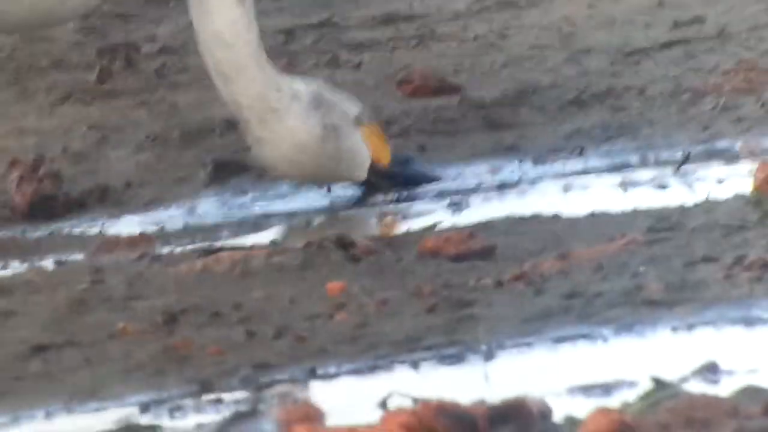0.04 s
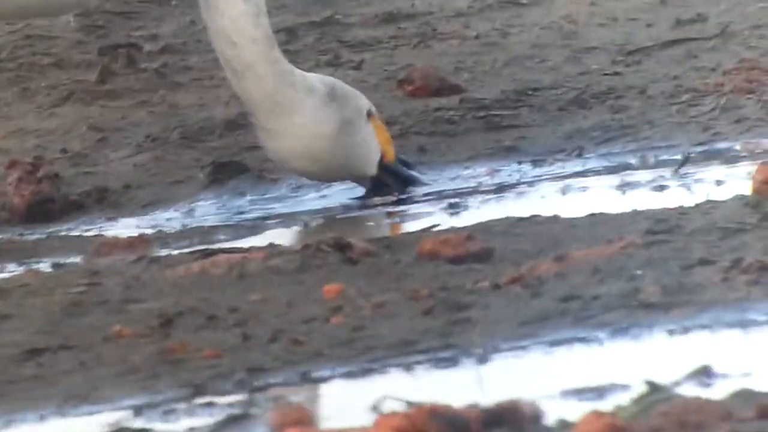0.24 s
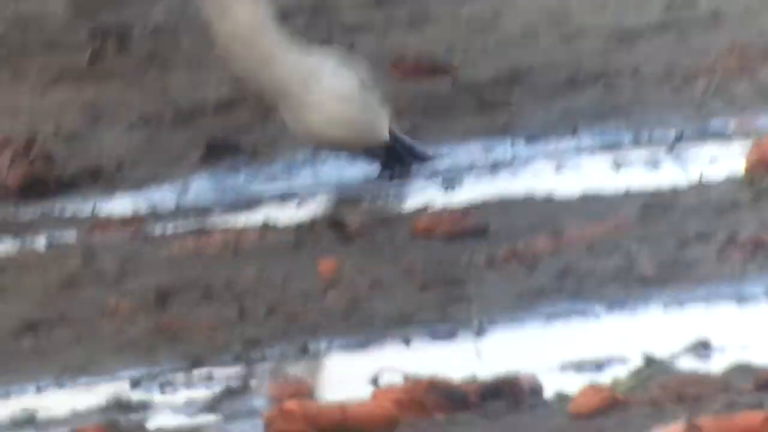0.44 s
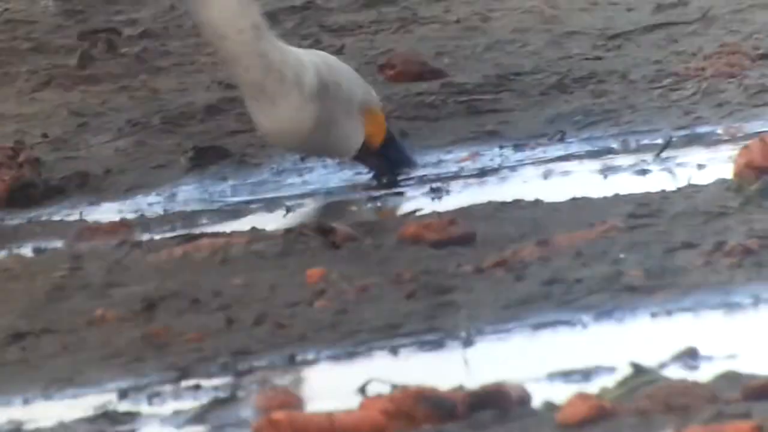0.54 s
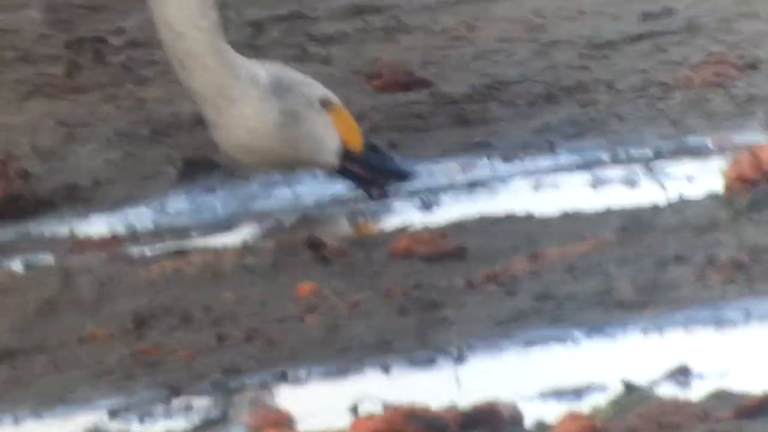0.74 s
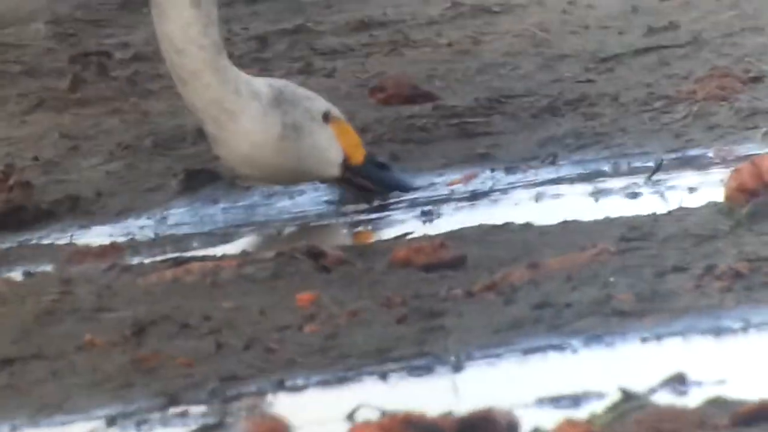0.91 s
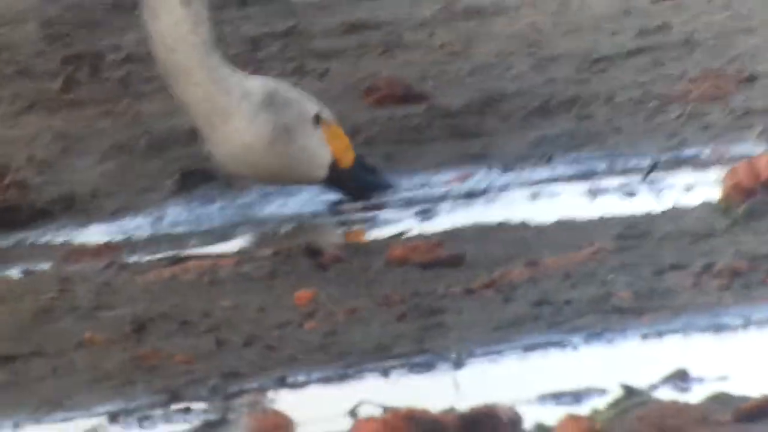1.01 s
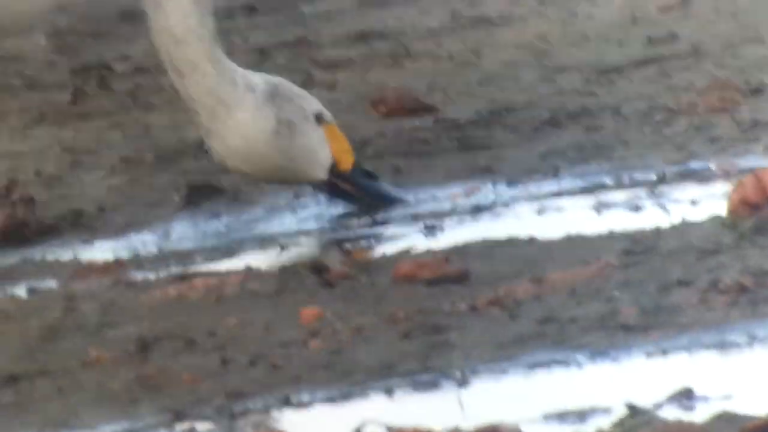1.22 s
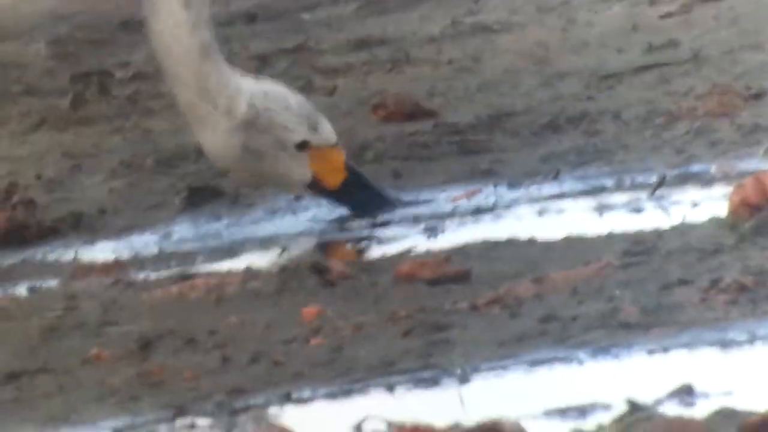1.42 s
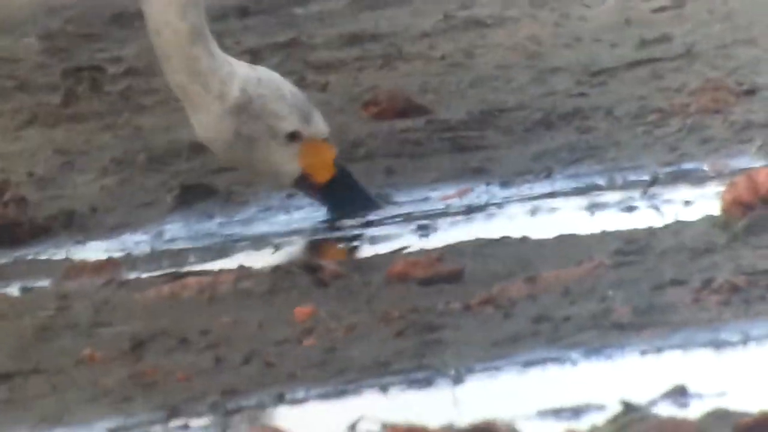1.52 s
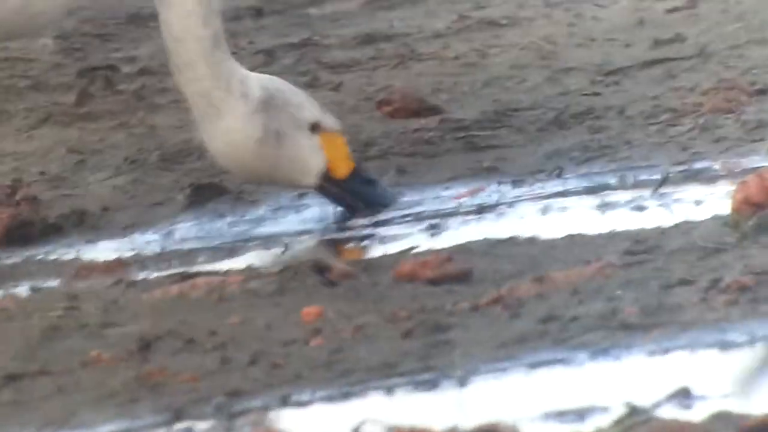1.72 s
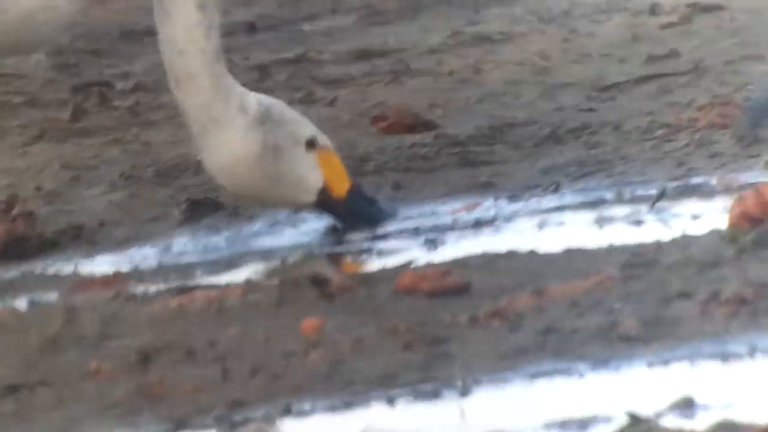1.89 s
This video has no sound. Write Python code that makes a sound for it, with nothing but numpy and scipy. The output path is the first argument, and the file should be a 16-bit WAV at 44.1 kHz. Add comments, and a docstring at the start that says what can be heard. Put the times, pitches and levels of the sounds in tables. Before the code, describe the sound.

Swan honks, clear and nasal with gliding pitch, outdoors on open mud. A higher bird calls at 0.2-0.5 seconds, louder at 0.7-0.9, then briefly and roughly at 1.0-1.1. A lower bird gives one short brassy honk at 1.6-1.75. A steady distant roar leans left throughout, with faint smooth hiss. Small low wind puffs touch the microphones, strongest as fluttering thumps on the right near 0.95.

```python
"""Open muddy ground, with two swans honking in front of a recorder that has two microphone ports.
The calls are clean and nasal, stacks of partials on one gliding pitch: three from a higher bird, one from a lower.
A distant roar arrives from one side: coloured noise, partly shared by the two ports.
Wind puffs on the ports are bursts of low noise; the strongest adds ringing buffets, mostly at the right port.
The recorder adds smooth bright hiss, and the top of the sound is cut steeply."""
import sys
import numpy as np
from scipy import signal
from scipy.fft import rfft, irfft, next_fast_len
from scipy.io import wavfile
from scipy.ndimage import uniform_filter1d

SR = 44100
rng = np.random.default_rng(int(sys.argv[2]) if len(sys.argv) > 2 else 0)


def output_pcm(signal):
    """Save a mono or channel-first signal as 16-bit PCM at the path in sys.argv[1].

    Samples are clipped to [-1, 1] before scaling.
    """
    pcm = np.clip(np.atleast_2d(signal).T, -1, 1) * 32767
    wavfile.write(sys.argv[1], SR, np.round(pcm).astype(np.int16))


N = 85995  # samples, 1.95 s


def from_db(db):
    """Decibels to gain."""
    return 10 ** (np.asarray(db) / 20)


def rms_one(x):
    """Scale to unit rms."""
    return x / np.sqrt(np.mean(x ** 2) + 1e-20)


def at_hz(points, hz, axis=1):
    """Read a column of a table along log frequency."""
    points = np.array(points)
    return np.interp(np.log(hz), np.log(points[:, 0]), points[:, axis])


def drift(rate, size):
    """Slow random wander of about unit spread: noise through two equal poles at the rate in Hz."""
    step, settle = 8, 6000  # made at an eighth of the sample rate; the start-up is dropped
    count = size // step + 2
    pole = np.exp(-2 * np.pi * rate * step / SR)
    slow = signal.lfilter([1], [1, -2 * pole, pole * pole], rng.standard_normal(count + settle))
    return np.interp(np.arange(size) / step, np.arange(count), rms_one(slow)[settle:])


# Calls of the higher bird, one list per call. Each row: time in seconds, pitch in Hz, fundamental in dB,
# second partial in dB, upper partials in dB, extra loss in dB per multiple from the fifth to the ninth,
# flutter from 0 to 1, rasp in dB.
HIGHER_BIRD_CALLS = [
    [(.197, 601, -58, -60, -74, 4, .02, -72), (.212, 618.3, -43, -43, -70, 3, 0.1, -76),
     (.227, 638, -37, -39, -57, 0.5, 0.03, -72), (.241, 650, -35.5, -36.5, -63, 2.5, 0.08, -72),
     (.253, 657.4, -34, -34.5, -54.5, -1, 0, -72), (.271, 660, -33, -33.5, -48.5, 0.5, 0, -72),
     (.284, 653, -36, -43, -62, 0, 0.05, -72), (.291, 662, -41, -43, -80, -6, 0.2, -72),
     (.298, 697, -33, -47, -79, -6, 0, -69), (.305, 672, -38.5, -47, -70, 2, 0.1, -74),
     (.316, 645.3, -31.5, -38.5, -51, 0.5, 0.04, -78), (.345, 645, -35.5, -39.5, -54.5, 2, 0.07, -81),
     (.381, 652, -34.5, -35.5, -57, 1.5, 0, -70), (.42, 663.2, -33, -35, -51, 1.5, 0, -72),
     (.437, 659, -34, -38.5, -54, 1, .03, -72), (.452, 650, -41.5, -51, -78, 1, .05, -74),
     (.461, 666, -39, -51, -71, 1, .05, -72), (.476, 621, -36.5, -45, -61, -1, 0.14, -66),
     (.499, 627, -44, -66, -76, 1, .05, -72)],
    [(.702, 610, -49, -54, -72, 4, .02, -70), (.709, 627, -37, -41, -58, 4, 0.1, -68),
     (.724, 628, -29.5, -38, -75, 4, 0, -75), (.742, 639, -29.5, -46, -61, 1, 0, -71),
     (.756, 660, -31, -55, -75, -4, 0.04, -75), (.774, 651, -36.5, -54, -68, 1, 0, -76),
     (.798, 643.4, -28.5, -36.5, -56, 5, .03, -60), (.82, 649, -26, -30, -56.5, 5, 0, -55),
     (.848, 649, -26, -33, -52, 3.5, 0.04, -67), (.88, 635, -27, -37.5, -65, -2, 0, -73),
     (.898, 618, -32.5, -47, -51.5, 7, 0.1, -59), (.911, 613, -34, -60, -61, 5, 0.1, -64),
     (.921, 618, -62, -62, -73, 5, .02, -68)],
    [(1.009, 628, -34, -58, -72, 4, 0.2, -68), (1.015, 634, -34.5, -58, -68, 4, 0.8, -67),
     (1.024, 628, -31.5, -40.5, -54, 6, 0.6, -66), (1.04, 625, -31.5, -42.5, -51, 4, 0.25, -60),
     (1.056, 613, -34.5, -47, -53, 3, 0.15, -58), (1.066, 601, -39, -52, -57, 8, .1, -67),
     (1.076, 590, -58, -38, -59, 4, 0.3, -68)],
]
# The call of the lower bird. Each row: the same columns in the same units.
LOWER_BIRD_CALLS = [
    [(1.612, 490, -53, -54, -64, 0, .02, -72), (1.622, 496.7, -44, -41, -56, 0, .02, -72),
     (1.636, 496.7, -40, -33, -46, -1.5, .02, -70), (1.655, 505, -36.5, -30.5, -41.5, -1.5, .02, -72),
     (1.672, 506, -39, -29, -39.5, 0.5, 0.018, -72), (1.695, 500.5, -37.5, -29, -38.5, 0.5, .02, -72),
     (1.712, 495, -39.5, -31, -41.5, 0.5, .02, -68), (1.722, 483.5, -41.5, -32, -45, 4, .02, -70),
     (1.736, 473, -46, -35, -54, 8, .02, -72), (1.753, 477, -60, -50, -72, 8, .02, -72)],
]
# Partials of the higher bird as they reach the two ports.
# Each row: multiple of the pitch, level in dB over its control, left minus right in dB, left lead in radians.
HIGHER_BIRD_PARTIALS = [(1, 0.5, 3, 0.12), (2, 0, 3, -.45), (3, -1, 5.5, -2), (4, -12.5, -20, -2),
                        (5, 1, 11, 0.4), (6, -1, 4, 1.3), (7, 0.5, -2, 2), (8, -9.5, 3, 1),
                        (9, -18, -1, 1.5), (10, -19, -2, 1.5), (11, -17, 8, 1.5)]
# Partials of the lower bird at the ports. Each row: the same columns in the same units.
LOWER_BIRD_PARTIALS = [(1, 0, 2.5, .1), (2, 1, 6, -0.66), (3, 2, 4.5, -1.1), (4, -12.5, 12.5, -1.1),
                       (6, -17.5, 9, 0.09), (7, -9.5, -2.3, -0.32), (10, -31, 2, 0), (12, -37, 9, -0.039),
                       (14, -32, 6, 0.11)]
# A narrow resonance of the open beak. Each row: time in seconds, centre in Hz, lift in dB.
BEAK_RESONANCE = [(.2, 5000, 10), (.24, 5200, 16), (.256, 5250, 2.5), (.825, 4550, 0), (.848, 4550, 3),
                  (.87, 4500, 1), (1.635, 6050, 0), (1.665, 6100, 10), (1.685, 7050, 9), (1.715, 7000, -2)]
BEAK_WIDTH_HZ = 380  # from the centre to where the lift in dB has fallen to 1/e
FLUTTER_HZ, FLUTTER_GROWTH = 123.7, 0.61  # tone this far above each partial; exponent on the multiple
JITTER_SHARE, JITTER_HZ = .0012, 60  # random pitch wobble: spread as a share of the pitch, rate
SHIMMER_DB, SHIMMER_HZ = 1.5, 26  # random level wobble of each upper partial: spread, rate
RASP_LOW_HZ, RASP_HIGH_HZ, RASP_PAN_DB = 3330, 3900, -5  # throat air noise: band, left minus right
HALF_MULTIPLE, HALF_DB = 5.5, -2  # line between two partials from uneven cycles; dB over the air noise


def swan(calls, partials):
    """Sum clean partials on one pitch; a second vibration adds side tones, throat air a rasp."""
    out = np.zeros((2, N))
    side = np.array([[.5], [-.5]])  # splits each left-right difference evenly
    throat = signal.butter(2, [RASP_LOW_HZ, RASP_HIGH_HZ], "band", fs=SR, output="sos")
    beak_times, *beak_columns = np.transpose(BEAK_RESONANCE)
    for rows in calls:
        times, *columns = np.transpose(rows)
        first, last = int(times[0] * SR), int(times[-1] * SR)
        t = np.arange(first, last) / SR
        hz, low_db, second_db, upper_db, dull_db, flutter, rasp_db = [np.interp(t, times, c) for c in columns]
        flutter = np.clip(flutter, 0, 1)
        flutter_phase = 2 * np.pi * FLUTTER_HZ * (t - t[0])
        wobbling_hz = hz * (1 + JITTER_SHARE * drift(JITTER_HZ, len(t)))
        phase = 2 * np.pi * np.cumsum(wobbling_hz) / SR
        beak_hz, beak_db = [np.interp(t, beak_times, c) for c in beak_columns]
        edge = signal.windows.tukey(len(t), .06)

        for multiple, level_db, pan_db, lead in partials:
            loss_db = dull_db * np.clip(multiple - 5, 0, 4)
            shimmer_db = SHIMMER_DB * drift(SHIMMER_HZ, len(t))
            lift_db = beak_db * np.exp(-((multiple * hz - beak_hz) / BEAK_WIDTH_HZ) ** 2)
            if multiple == 1:
                control_db = low_db
            elif multiple == 2:
                control_db = second_db
            else:
                control_db = upper_db - loss_db + shimmer_db + lift_db
            gain = np.sqrt(2) * from_db(control_db + level_db + side * pan_db) * edge
            turn = multiple * phase + rng.uniform(0, 2 * np.pi) + side * lead
            above = flutter * multiple ** FLUTTER_GROWTH
            pair = np.sin(turn) + above * np.sin(turn + flutter_phase)
            out[:, first:last] += gain * pair / np.sqrt(1 + above ** 2)  # flutter leaves the power alone

        air = rms_one(signal.sosfilt(throat, rng.standard_normal(len(t))))
        half_line = np.sqrt(2) * from_db(HALF_DB) * np.sin(HALF_MULTIPLE * phase)
        out[:, first:last] += (air + half_line) * edge * from_db(rasp_db + side * RASP_PAN_DB)
    return out


# Colour of the distant roar. Each row: frequency in Hz, relative density in dB per Hz.
ROAR_COLOUR = [(15, -58), (25, -41), (92, -11), (113, -10.5), (172, -3), (208, -7.5), (339, -4), (380, -6),
               (417, -5.5), (565, -11.5), (635, -6), (859, -5.5), (1030, -1.5), (1140, -5), (1610, -7),
               (1850, -11.5), (2340, -13), (2680, -19.5), (3720, -23.5), (4590, -29), (6500, -42),
               (8450, -59), (14300, -120)]
# Lean of the roar between the ports. Each row: frequency in Hz, left minus right in dB.
ROAR_LEAN = [(60, 0), (200, 0.7), (400, 1.4), (700, 3.5), (1300, 2.5), (2400, 1), (4400, 3), (6000, 0)]
# What both ports hear alike. Each row: frequency in Hz, share of the power from 0 to 1, left lead in radians.
ROAR_SHARED = [(60, 0.93, 0.4), (129, 1, -0.8), (295, 0.9, 0), (530, 0.77, -0.1), (736, 0.86, -1.33),
               (1120, 0.92, -1.72), (1430, 0.83, -3), (1940, 0.61, -3.5), (2295, 0.46, -6), (2940, 0.3, -6),
               (4000, 0.26, -5.5), (6000, 0, -1.5)]
ROAR_DB = -37.5  # rms over both ports
ROAR_SWELL_DB, ROAR_SWELL_HZ = .8, 5.7  # level wander of the whole roar: spread, rate
ROAR_PATCH_DB, ROAR_PATCH_HZ = .5, 0.9  # level wander of each octave: spread, rate


def roar():
    """Coloured noise: a shared part with a phase offset at the left port, and a part of each port's own."""
    size = next_fast_len(N)
    hz = np.maximum(np.arange(size // 2 + 1) * SR / size, 1)
    shared, left, right = rfft(rng.standard_normal((3, size)))
    alike = np.clip(at_hz(ROAR_SHARED, hz), 0, 1)
    left_turn = np.exp(1j * at_hz(ROAR_SHARED, hz, axis=2))
    common = np.sqrt(alike) * shared * np.array([left_turn, np.ones(len(hz))])
    own = np.sqrt(1 - alike) * np.array([left, right])
    pan = from_db(at_hz(ROAR_LEAN, hz) / 2)
    pair = from_db(at_hz(ROAR_COLOUR, hz)) * (common + own) * [pan, 1 / pan]

    out = np.zeros((2, N))
    swell_db = ROAR_SWELL_DB * drift(ROAR_SWELL_HZ, N)
    octave = np.clip(np.log2(hz / 30), 0, 9)
    for k in range(10):
        share = np.clip(1 - np.abs(octave - k), 0, 1)  # overlapping bands that add up to one
        band = irfft(pair * share, size)[:, :N]
        out += band * from_db(swell_db + ROAR_PATCH_DB * drift(ROAR_PATCH_HZ, N))
    return from_db(ROAR_DB) * rms_one(out)


# Light puffs of wind on the ports. Each row: centre in seconds, length in seconds between the 1/e points,
# level in dB at the stronger port, left minus right in dB.
WIND_PUFFS = [(0.161, 0.037, -42.5, -27), (0.293, 0.061, -47, -16), (0.519, 0.03, -37.5, 7),
              (.96, .05, -42, -18), (1.25, 0.029, -49, -18), (1.372, 0.014, -43, -19)]
PUFF_LOW_HZ, PUFF_HIGH_HZ = 110, 300
PUFF_LUMP_DB, PUFF_LUMP_HZ = 1.5, 61.0  # random level wobble: spread, rate


def wind():
    """Short lumpy puffs of low noise, unrelated at the two ports."""
    band = signal.butter(3, [PUFF_LOW_HZ, PUFF_HIGH_HZ], "band", fs=SR, output="sos")
    noise = rms_one(signal.sosfilt(band, rng.standard_normal((2, N))))
    local_power = uniform_filter1d(noise ** 2, size=900)
    steady_noise = noise / np.sqrt(local_power + .05)  # evens out chance swells
    t = np.arange(N) / SR
    gust = np.zeros((2, N))
    for centre, length, level_db, pan_db in WIND_PUFFS:
        bell = np.exp(-np.abs(2 * (t - centre) / length) ** 3)
        weaker_port_db = np.minimum([[pan_db], [-pan_db]], 0)
        gust += bell * from_db(level_db + weaker_port_db)
    return steady_noise * gust * from_db(PUFF_LUMP_DB * drift(PUFF_LUMP_HZ, N))


# The strongest puff breaks into separate buffets on the right port.
# Each row: start in seconds, level in dB of the push before its filters, ring in Hz.
PORT_BUFFETS = [(.932, -28, 240), (.9435, -20, 230), (.9565, -17.5, 260), (.9695, -19, 185)]
BUFFET_T60_S, BUFFET_LEFT_DB = .045, -20  # ring decay by 60 dB; left port relative to the right


def buffets():
    """Each buffet is a soft push that rings the port for a few cycles."""
    out = np.zeros(N)
    decay = from_db(-60 / (BUFFET_T60_S * SR))  # per sample
    for start, level_db, hz in PORT_BUFFETS:
        push = np.zeros(N) + 1e-18  # tiny floor keeps the filters' arithmetic fast
        push[int(start * SR)] = from_db(level_db)
        softener = signal.butter(1, [hz / 2, 2 * hz], "band", fs=SR, output="sos")
        soft_push = signal.sosfilt(softener, push)
        w = 2 * np.pi * hz / SR
        out += signal.lfilter([0, np.sin(w)], [1, -2 * decay * np.cos(w), decay * decay], soft_push)
    return out * from_db([[BUFFET_LEFT_DB], [0]])


# Colour of the recorder's hiss. Each row: frequency in Hz, relative density in dB per Hz.
HISS_COLOUR = [(5000, -34), (6500, -5.5), (8000, 0), (11000, 1), (13500, 1.5), (14500, -3.5)]
HISS_DB = -58.5  # rms before the top is cut


def hiss():
    """Smooth bright noise of the recorder, its own in each channel."""
    size = next_fast_len(N)
    hz = np.maximum(np.arange(size // 2 + 1) * SR / size, 1)
    spectrum = rfft(rng.standard_normal((2, size))) * from_db(at_hz(HISS_COLOUR, hz))
    noise = irfft(spectrum, size)[:, :N]
    return from_db(HISS_DB) * rms_one(noise)


def scene():
    """Both birds in front of the roar, the wind on the ports and the hiss."""
    birds = swan(HIGHER_BIRD_CALLS, HIGHER_BIRD_PARTIALS) + swan(LOWER_BIRD_CALLS, LOWER_BIRD_PARTIALS)
    return birds + roar() + wind() + buffets() + hiss()


CUTOFF_HZ = 14620


def record(dry):
    """Cut the top steeply with an elliptic low-pass: 0.2 dB ripple, 90 dB rejection."""
    return signal.sosfilt(signal.ellip(14, .2, 90, CUTOFF_HZ, fs=SR, output="sos"), dry)


dry = scene()
out = record(dry)
output_pcm(out)
```